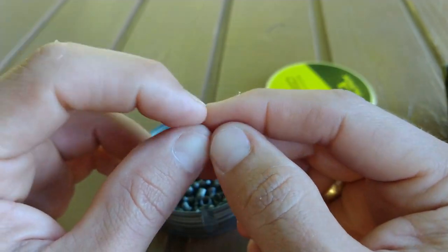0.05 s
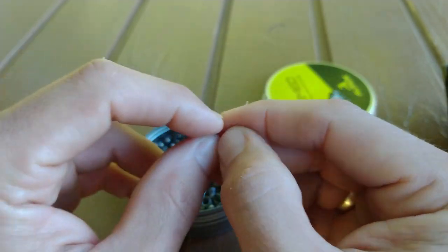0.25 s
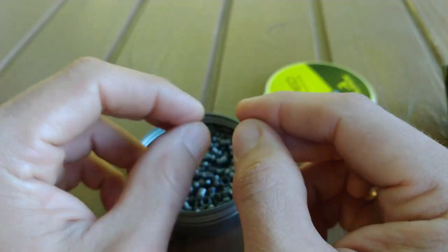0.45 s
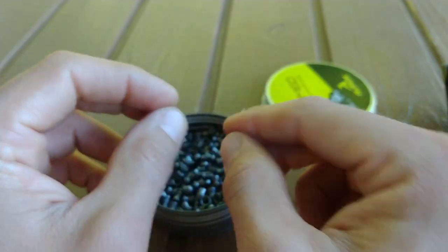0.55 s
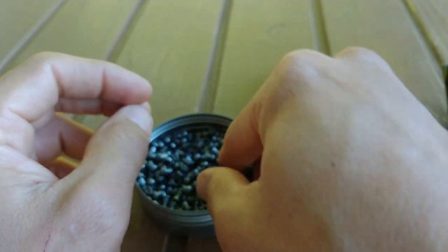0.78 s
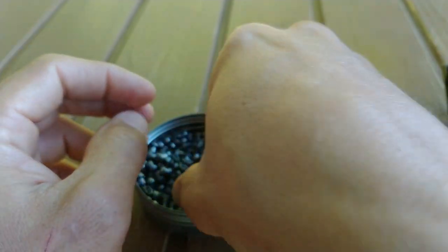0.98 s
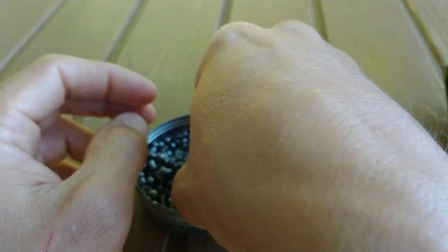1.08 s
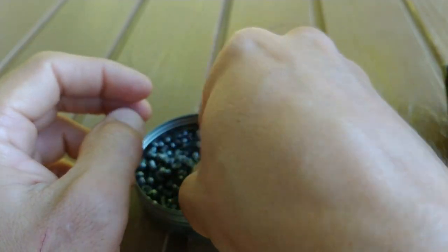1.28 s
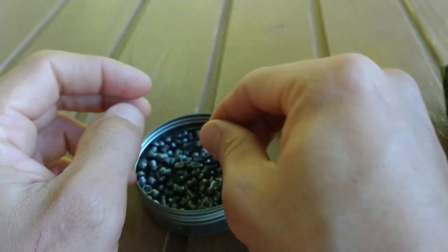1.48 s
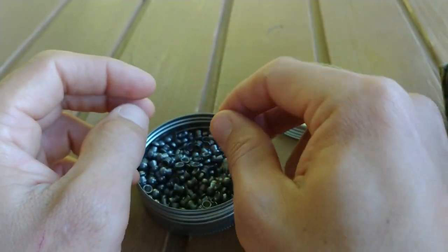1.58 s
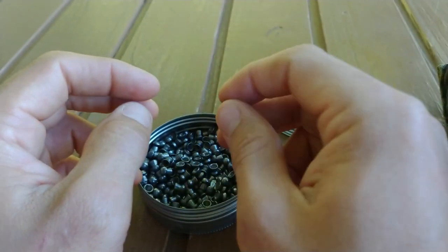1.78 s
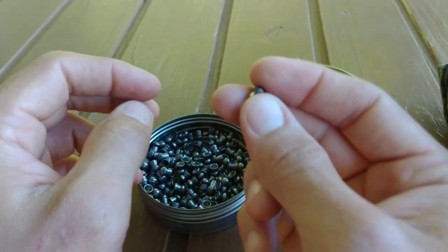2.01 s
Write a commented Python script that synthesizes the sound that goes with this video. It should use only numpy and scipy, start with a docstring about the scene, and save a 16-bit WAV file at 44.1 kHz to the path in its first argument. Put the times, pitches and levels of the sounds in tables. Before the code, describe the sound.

Small metal pellets clink and rattle in a tin, heard close. A dropped pellet knocks dryly on wood at 0.23 s, much fainter at 0.33 and again at 0.64. From about 0.88 to 1.55 fingers stir the heap, a bright crunch with a soft skin rub, densest around 1.1-1.3. A few clinks and dull bumps follow at 1.7-1.83, a soft bump at 2.03, over faint hiss and rumble.

```python
"""Three dry knocks of a dropped lead pellet, then a crunching, clinking heap and a few late clinks.
Fingers sort pellets in a small round tin on a wooden table, close to the microphone.
Knocks and clinks are coloured clicks with short scatter plus ringing modes of table or tin.
Crunch and scuff are random grains under level curves, the crunch with pings; hand bumps are damped thumps.
A small room answers knocks, clinks and crunch faintly, over steady hiss and rumble."""
import sys
import numpy as np
from scipy import signal
from scipy.fft import rfft, irfft
from scipy.io import wavfile

SR = 44100
rng = np.random.default_rng(int(sys.argv[2]) if len(sys.argv) > 2 else 0)


def master_out(mix):
    """Clip the mix to full scale and print it as 16-bit PCM to the path in sys.argv[1]."""
    frames = np.transpose(np.atleast_2d(mix))
    ceiling = np.clip(frames, -1, 1)
    pcm = np.round(ceiling * 32767).astype(np.int16)
    wavfile.write(sys.argv[1], SR, pcm)


N = 90404

# dropped pellet: t/s, level/dB, thud f/Hz, thud peak/dB, ring peak/dB, treble shelf/dB, heap shiver/dB
KNOCK_EVENTS = [(0.2326, -17, 1600, 3, 3.5, -1, -59), (0.3306, -39, 1300, -1, 13, -2.5, -79),
                (0.6412, -23, 950, 4, -1, -2.5, -43.5)]
# modes of the tin: f/Hz, relative level/dB, t60/s
TIN_MODES = [(286, -26.5, 0.14), (687, -24, 0.058), (2907, -23.5, .03), (3065, -13.5, 0.036),
             (5180, -16.5, .02), (7110, -16.5, 0.023), (9650, -22, 0.0082)]
GRAINS_PER_S = 2200


def amp(db):
    """Decibels to gain."""
    return 10 ** (np.asarray(db) / 20)


def read(points, hz):
    """Interpolates a curve on a log-frequency axis."""
    f, value = np.transpose(points)
    return np.interp(np.log(hz + 1), np.log(f + 1), value)


def unit(x):
    """Scales each channel to energy 1."""
    return x / np.sqrt(np.sum(x ** 2, -1, keepdims=True) + 1e-20)


def add(mix, start_s, sound):
    """Mixes a sound in at a time."""
    part = mix[:, round(start_s * SR):][:, :sound.shape[1]]
    part += sound[:, :part.shape[1]]


def bins(size=4096):
    """FFT bin frequencies in Hz."""
    return np.fft.rfftfreq(size, 1 / SR)


def causal(db):
    """Minimum-phase click with this spectrum, energy 1."""
    log_gain = np.log(amp(np.r_[db, db[-2:0:-1]]))
    spectrum = np.exp(np.conj(signal.hilbert(log_gain)))
    return unit(np.fft.ifft(spectrum).real[:len(db)])


def convolve(a, b):
    """Convolution by channel, cut to N samples."""
    return signal.fftconvolve(np.atleast_2d(a), np.atleast_2d(b), axes=1)[:, :N]


def bump_db(hz, centre_hz, peak_db, octaves):
    """Gaussian resonance on an octave axis, in dB."""
    return peak_db * np.exp(-(np.log2((hz + 1) / centre_hz) / octaves) ** 2 / 2)


def paired(z):
    """Makes two unrelated channels partly alike by mixing common and opposed parts."""
    # correlation of the two ports: f/Hz, likeness/0-1
    likeness = [(60, 0), (200, 0.4), (600, 0.84), (1500, 0.79), (4000, 0.86), (9000, 0.82), (15000, 0.57)]
    like = np.clip(read(likeness, bins(size=z.shape[1])), 0, 1)
    a, b = rfft(z)
    common = np.sqrt((1 + like) / 2) * a
    opposed = np.sqrt((1 - like) / 2) * b
    return irfft(common + np.array([[1], [-1]]) * opposed, z.shape[1])


def tail(t60, size=4096):
    """Dense reflections, each band dying at its own speed; energy 1."""
    hz, t = bins(size=size), np.arange(size) / SR
    z = rfft(paired(rng.choice([-1., 1.], (2, size))))
    total = 0
    for centre, ring_s in t60:
        band = read([(f, f == centre) for f, _ in t60], hz)
        total = total + irfft(z * band) * amp(-60 * t / ring_s)
    return unit(total)


def room(x, wet_db):
    """Adds the faint answer of the room as a dense decaying tail."""
    # room decay: f/Hz, t60/s
    decay = [(150, 0.53), (1000, 0.0156), (4000, 0.1), (12000, 0.25)]
    return x + amp(wet_db) * convolve(x, tail(decay, size=12288))[:, :x.shape[1]]


def ringing(modes, size=4096):
    """Sum of exponentially dying cosines, each with the energy of its level."""
    t = np.arange(size) / SR
    total = 0
    for hz, db, t60_s in modes:
        mode = np.cos(2 * np.pi * hz * t) * np.exp(-np.log(1000) * t / t60_s)
        total = total + amp(db) * unit(mode)
    return total


def hit(level_db, colour_db, t60, scatter_db, ring):
    """A sharp contact, its short scatter and the ring of what is struck."""
    blow = amp(scatter_db) * tail(t60)
    blow[:, 0] += 1
    contact = unit(convolve(blow, causal(colour_db)))[:, :len(ring)]
    # contact energy: that of 2 ms at the level
    return amp(level_db) * np.sqrt(.002 * SR) * (contact + ring)


def grains(per_s):
    """Tiny collisions at random instants, of uneven size and drifting strength; rms 1."""
    spread_db, clump_db, clump_s = 3.5, 2, 0.0039
    sizes = amp(spread_db * np.minimum(rng.exponential(1, (2, N)), 4)) * rng.choice([-1, 1], (2, N))
    train = paired(sizes * (rng.random((2, N)) < per_s / SR))
    # sqrt(3) brings uniform draws to about unit spread
    clumps = np.interp(np.arange(N) / SR / clump_s, np.arange(N), rng.uniform(-0.91, 1, N)) * np.sqrt(3)
    return np.sqrt(N) * unit(train * amp(clump_db * clumps))


def gesture(points):
    """A level curve as gain; -120 dB outside its span."""
    return amp(np.interp(np.arange(N) / SR, *np.transpose(points), left=-120, right=-120))


def room_tone():
    """Steady faint hiss and rumble: Gaussian noise shaped by a spectrum."""
    level_db = -67.5
    # spectrum shape: f/Hz, relative level/dB
    air = [(25, -19), (42, -22), (62, -0.5), (100, -3.5), (185, -1.5), (310, -8.5), (600, -8), (1230, -9),
           (2100, -10), (3000, -8.5), (4370, -13), (5200, -12), (7300, -18.5), (8600, -25.5), (9600, -23),
           (13000, -30), (16000, -45)]
    z = rfft(paired(rng.standard_normal((2, N)))) * amp(read(air, bins(size=N)))
    return amp(level_db) * np.sqrt(N) * unit(irfft(z, N))


def knocks():
    """A pellet strikes: broad wooden thud, brief metal ring above, table modes sounding on."""
    thud_octaves, treble_edge_hz = .35, 7000
    ring_hz, ring_width_hz = 5200, 580
    scatter_db, wet_db = -1, -22
    # base colour: f/Hz, relative level/dB
    base = [(40, -59), (150, -23.5), (400, -13), (700, -10), (1100, 1.5), (1600, 0), (2300, -4), (3200, -6),
            (4200, -4), (5500, -7), (7000, -10.5), (9000, -27.5), (13000, -23), (16000, -41)]
    # scatter in the table top: f/Hz, t60/s
    wood_t60 = [(200, 0.044), (1100, 0.027), (3000, .018), (8000, .011)]
    # modes of the table top: f/Hz, relative level/dB, t60/s
    table = [(352, -35.5, 0.1), (681, -24.5, 0.097), (1009, -22, 0.069), (1179, -22.5, 0.06),
             (1360, -18.5, 0.06), (2830, -19.5, 0.033), (3560, -19, 0.027)]
    out, hz = np.zeros((2, N)), bins()
    for s, db, thud_hz, thud_db, ring_db, treble_db, _ in KNOCK_EVENTS:
        thud = bump_db(hz, thud_hz, thud_db, thud_octaves)
        metal = ring_db * np.exp(-((hz - ring_hz) / ring_width_hz) ** 2 / 2)
        treble = treble_db * (1 - 1 / (1 + (hz / treble_edge_hz) ** 4))
        colour = read(base, hz) + thud + metal + treble
        add(out, s, hit(db, colour, wood_t60, scatter_db, ringing(table)))
    return room(out, wet_db)


def pings(count=12):
    """Sparse collisions, each exciting a brief ring at one of several pitches; rms 1."""
    low_hz, high_hz, t60_s, per_s = 1700, 12000, .006, 70  # rate is per pitch
    total = 0
    for hz in np.geomspace(low_hz, high_hz, count):
        ping = convolve(grains(per_s), ringing([(hz, 0, t60_s)]))
        total = total + ping * np.sqrt(hz)  # higher pitches stronger
    return np.sqrt(N) * unit(total)


def stirring():
    """The heap shivers after each knock, crunches under the finger and rings the tin."""
    shiver_s, ping_db, crunch_db, wet_db = .014, -2, -3, -11
    # finger stirring: t/s, level before crunch_db/dB
    stir = [(.878, -75), (.888, -49), (.91, -51), (.945, -65.5), (.975, -62), (1.005, -51), (1.025, -69.5),
            (1.05, -66.5), (1.075, -47), (1.11, -47), (1.15, -41), (1.175, -37.5), (1.2, -49), (1.235, -36),
            (1.258, -32), (1.276, -43), (1.31, -42.5), (1.325, -48), (1.364, -57), (1.40, -52),
            (1.425, -44), (1.445, -50.5), (1.468, -52.5), (1.485, -78), (1.545, -62), (1.58, -82)]
    # colour of the heap: f/Hz, relative level/dB
    heap = [(40, -41), (150, -21), (300, -17.5), (700, -24), (1600, -9), (2300, -5.5), (3100, 1.5),
            (3900, -6.5), (5200, -1.5), (6300, -3), (7200, -5), (8500, -13), (9700, -8), (10600, -16.5),
            (13500, -19), (15200, -22), (16200, -40)]
    t = np.arange(N) / SR
    shiver = sum(amp(db) * (t > s) * np.exp(-abs(t - s) / shiver_s) for s, *_, db in KNOCK_EVENTS)
    body = causal(read(heap, bins(size=8192)))
    body = unit(body + ringing(TIN_MODES, size=len(body)))
    crunch = amp(crunch_db) * (grains(GRAINS_PER_S) + amp(ping_db) * pings())
    return room(convolve(crunch * (gesture(stir) + shiver), body), wet_db)


def bumps():
    """Soft bumps of the hand on tin and table: dull, quickly damped thumps."""
    t60_s, slope_db_per_octave = .045, 12.5
    # bumps: t/s, level/dB, f/Hz
    events = [(.332, -57.5, 272), (.388, -69, 330), (.787, -62.5, 210), (1.708, -57, 191),
              (1.790, -65, 160), (2.032, -57.5, 447)]
    out = np.zeros((2, N))
    for s, db, pitch_hz in events:
        thump = causal(-slope_db_per_octave * abs(np.log2((bins() + 1) / pitch_hz)))
        sound = unit(convolve(tail([(pitch_hz, t60_s)]), thump))
        add(out, s, amp(db) * np.sqrt(SR / 100) * sound)  # energy of 10 ms at the level
    return out


def clinks():
    """Pellets tap each other and the tin; each contact has one broad resonance of its own."""
    contact_octaves, scatter_db, tin_db, wet_db = 0.33, 4.5, -2.5, -17
    # single clinks: t/s, level/dB, resonance f/Hz, resonance peak/dB
    events = [(.7875, -59, 7500, 5.5), (0.8894, -39.5, 3200, 12), (0.8935, -33, 3200, 11.5),
              (0.8997, -36.5, 3100, 9), (.9030, -39.5, 1800, 18), (.9103, -41.5, 3300, 3),
              (.9190, -48, 3200, 3), (0.94, -55, 3200, 2), (.9660, -51, 800, 1), (0.9767, -52.5, 3200, -10),
              (0.9937, -52, 800, 5), (1.0009, -36, 4500, 7.5), (1.0555, -57, 5000, -4),
              (1.0713, -40.5, 7500, 7), (1.0790, -29.5, 3100, 8.5), (1.0832, -29.5, 1700, 12),
              (1.1150, -31.5, 4000, 9), (1.1320, -38, 5000, 10), (1.1658, -39, 3200, -10),
              (1.1722, -28, 3300, 6), (1.1752, -29.5, 5200, 9), (1.2087, -35, 5200, 9),
              (1.2455, -28, 5200, 15), (1.2584, -26, 3200, 24), (1.2846, -35, 5200, 2),
              (1.299, -34.5, 5200, 18), (1.304, -28.5, 3000, -3), (1.3061, -33, 1900, 14),
              (1.3873, -40.5, 5000, 2), (1.3993, -37, 3000, -5), (1.407, -40, 7000, 8),
              (1.4130, -32, 2000, 10), (1.4134, -35, 10000, 8), (1.449, -40, 7000, 0),
              (1.4551, -42, 3000, -1), (1.4708, -45, 2000, 4), (1.499, -55, 7000, 3),
              (1.5242, -45, 1900, 3.5), (1.5416, -52, 7000, 1), (1.5524, -48, 7000, 7.5),
              (1.7075, -29, 2200, 8.5), (1.7140, -38.5, 3200, 2), (1.7171, -46, 3200, 12),
              (1.7384, -42.5, 3200, 3), (1.7580, -52, 3000, -1), (1.7861, -30.5, 2300, 16.5),
              (1.7872, -34.5, 1250, 14), (1.7945, -47, 5000, -3), (1.8003, -46, 3200, 6),
              (1.8093, -47.5, 7000, 12), (1.8268, -37.5, 3000, 14), (1.8285, -39.5, 1800, 15),
              (1.8326, -42, 3300, 7)]
    # base colour: f/Hz, relative level/dB
    base = [(40, -45.5), (200, -17.5), (700, -16), (1500, -6), (3000, -0.5), (5500, -0.5), (7500, -4.5),
            (8600, -11), (9600, -5.5), (11000, -10), (14000, -17.5), (16000, -25)]
    # scatter: f/Hz, t60/s
    scatter_t60 = [(200, 0.033), (1200, 0.015), (4000, 0.0094), (12000, 0.0085)]
    out, hz = np.zeros((2, N)), bins()
    tin = amp(tin_db) * ringing(TIN_MODES)
    for s, db, pitch_hz, peak_db in events:
        colour = read(base, hz) + bump_db(hz, pitch_hz, peak_db, contact_octaves)
        add(out, s, hit(db, colour, scatter_t60, scatter_db, tin))
    return room(out, wet_db)


def scuffing():
    """Fingertip skin slips over the pellets: a low, grainy rub."""
    # rub: t/s, level/dB
    scuff = [(.88, -84), (.90, -61.5), (.935, -65.5), (.972, -57.5), (1.005, -60), (1.04, -68), (1.10, -61),
             (1.17, -53), (1.205, -58), (1.255, -46.5), (1.285, -58.5), (1.35, -65.5), (1.42, -65),
             (1.47, -69), (1.50, -79)]
    # colour of the rub: f/Hz, relative level/dB
    skin = [(40, -37), (130, -15), (220, -10), (280, 0.5), (340, -6), (650, 0.5), (900, -4), (1200, -4),
            (1700, -16), (3000, -22), (16000, -58)]
    return convolve(grains(GRAINS_PER_S) * gesture(scuff), causal(read(skin, bins())))


def scene():
    """Sums everything on the table and the room tone."""
    return room_tone() + knocks() + stirring() + bumps() + clinks() + scuffing()


def record(dry):
    """Two microphone ports differ in phase and level and lose deep bass; then a low-pass."""
    low_cut_hz, edge_hz = 42, 16300
    # balance of the ports: f/Hz, left minus right/dB
    balance = [(60, -5), (180, -4.5), (400, -0.5), (700, 2), (1400, -2.5), (2400, -5.5), (4400, 2.5),
               (8000, 1), (15000, -1)]
    # phase lag of the left port behind the right: f/Hz, lag/cycles
    lag = [(1064, 0), (2130, .5), (4300, 1.5), (6350, 2.5), (8500, 3.5), (10300, 4.5), (16500, 7.5)]
    hz = bins(size=N)
    low_cut = (1j * hz / (1j * hz + low_cut_hz)) ** 2
    lean = amp(read(balance, hz) / 2)
    lag_cycles = np.interp(hz, *np.transpose(lag))
    ports = np.array([lean * np.exp(-2j * np.pi * lag_cycles), 1 / lean])
    picked_up = irfft(rfft(dry) * ports * low_cut, N)
    low_pass = signal.firwin(255, edge_hz, window=("kaiser", 9), fs=SR)
    return signal.oaconvolve(picked_up, low_pass[None], "same")


dry = scene()
out = record(dry)
master_out(out)
```